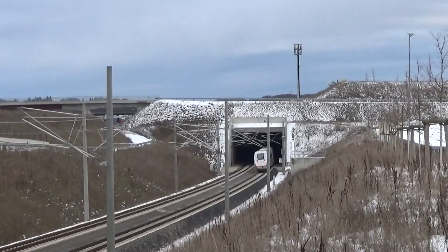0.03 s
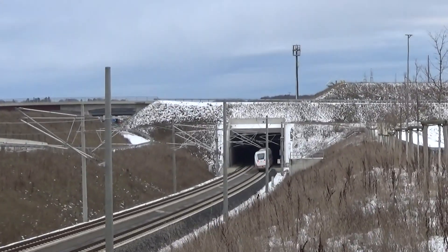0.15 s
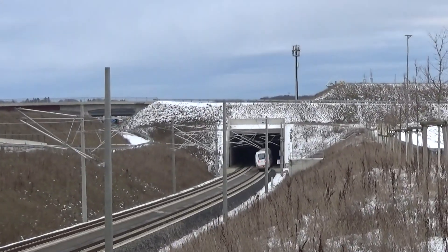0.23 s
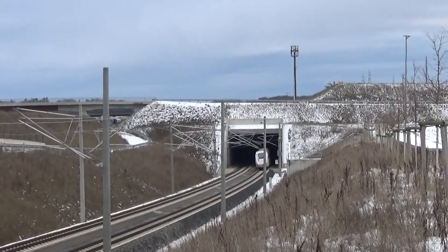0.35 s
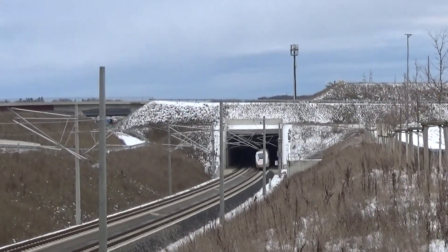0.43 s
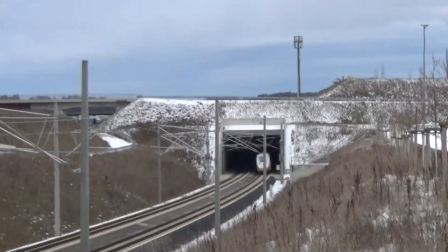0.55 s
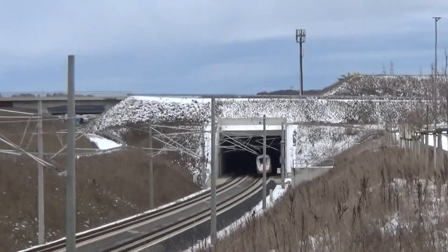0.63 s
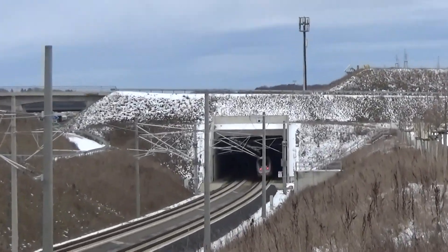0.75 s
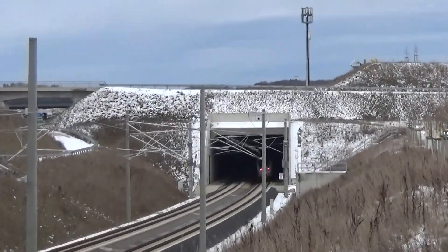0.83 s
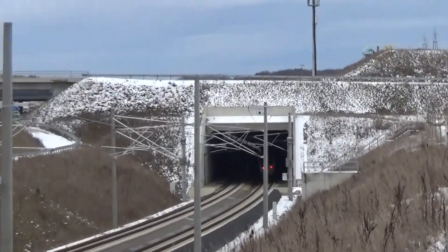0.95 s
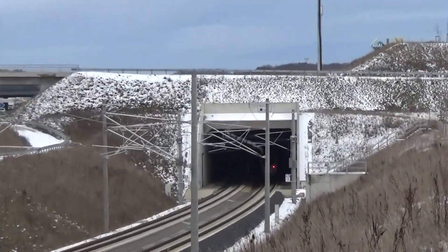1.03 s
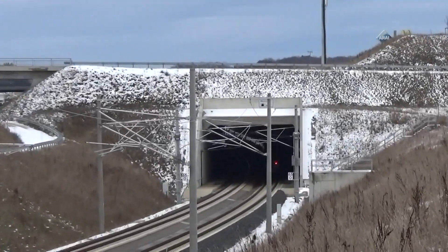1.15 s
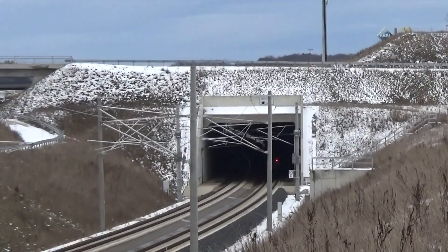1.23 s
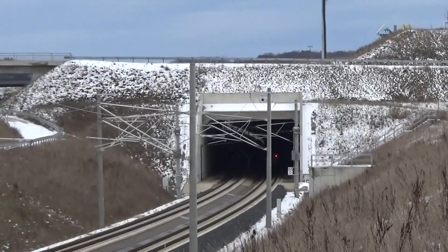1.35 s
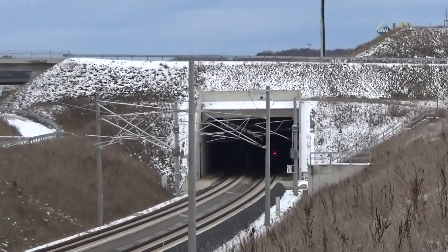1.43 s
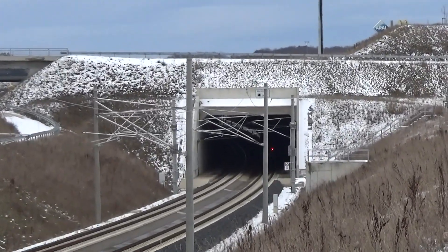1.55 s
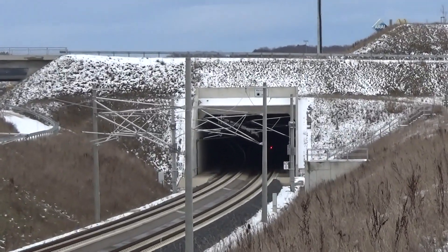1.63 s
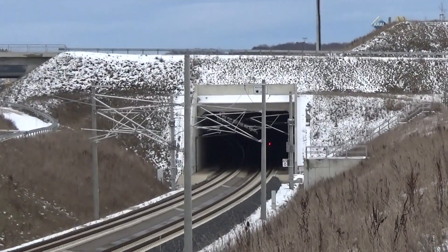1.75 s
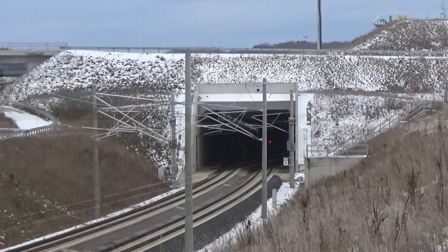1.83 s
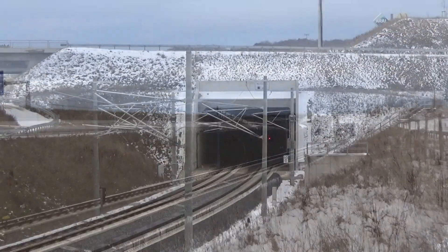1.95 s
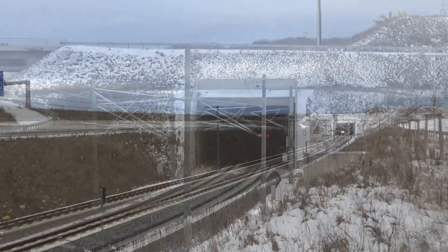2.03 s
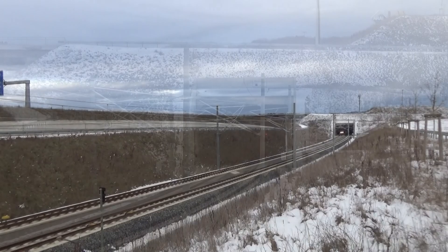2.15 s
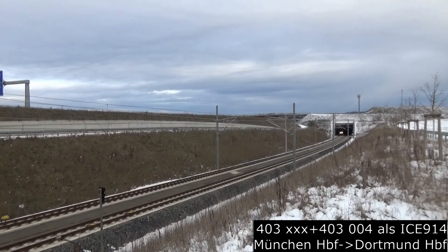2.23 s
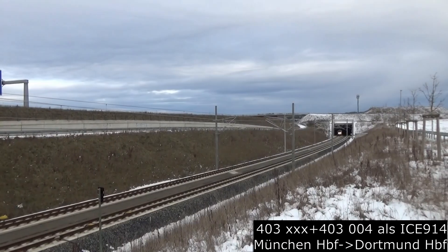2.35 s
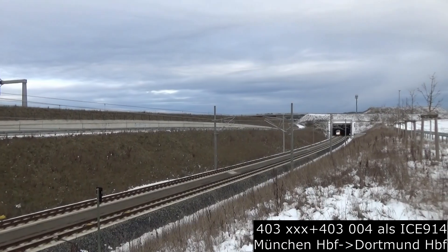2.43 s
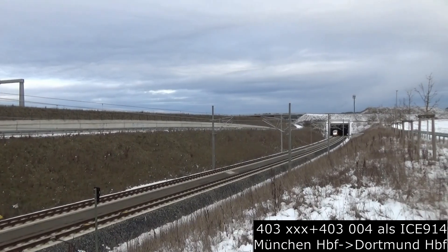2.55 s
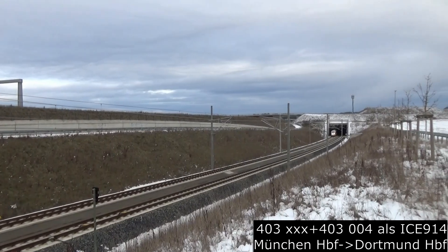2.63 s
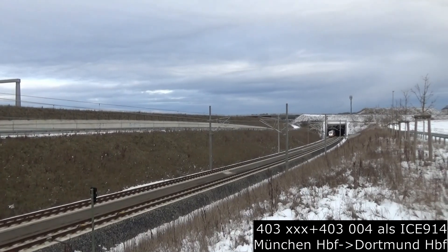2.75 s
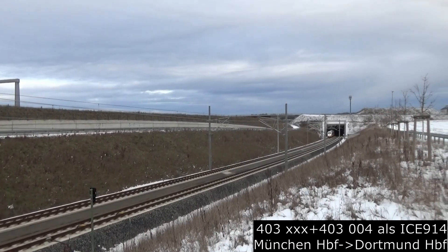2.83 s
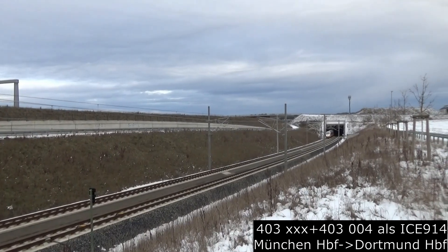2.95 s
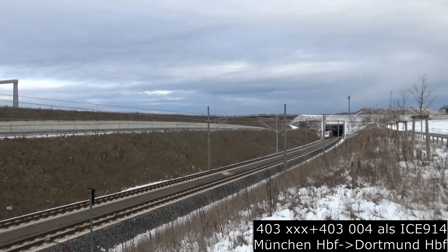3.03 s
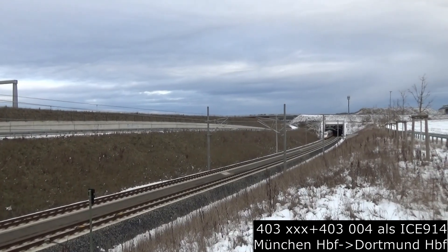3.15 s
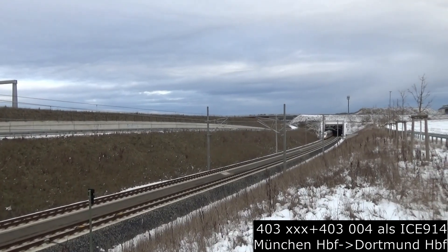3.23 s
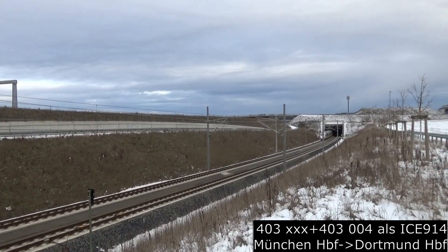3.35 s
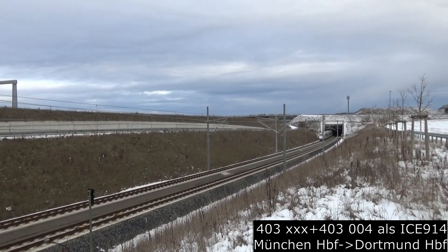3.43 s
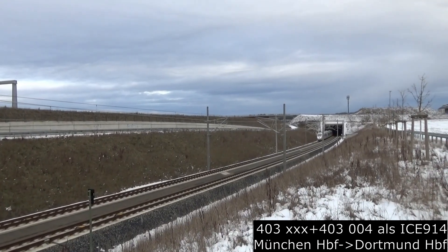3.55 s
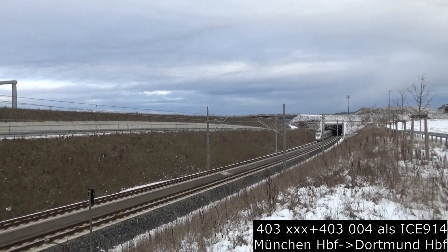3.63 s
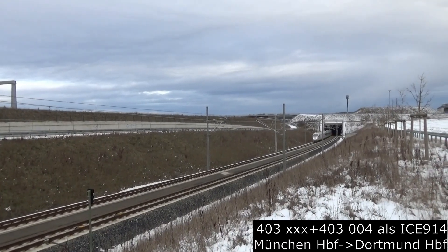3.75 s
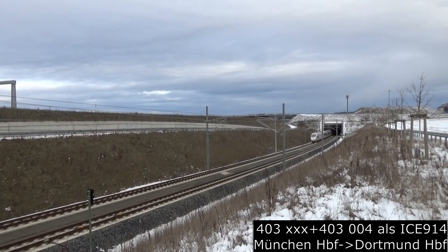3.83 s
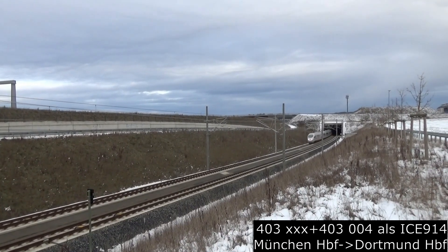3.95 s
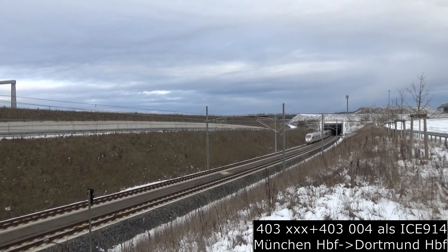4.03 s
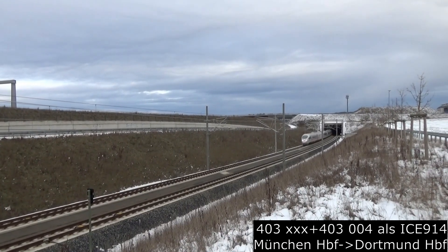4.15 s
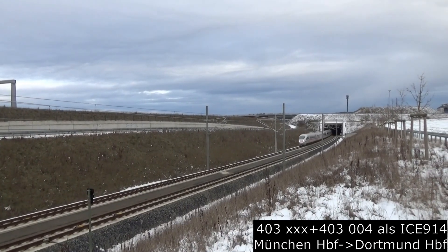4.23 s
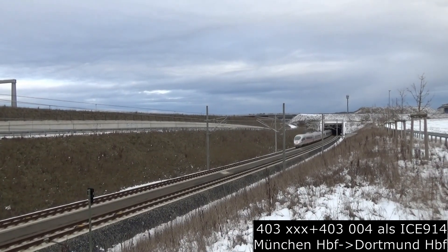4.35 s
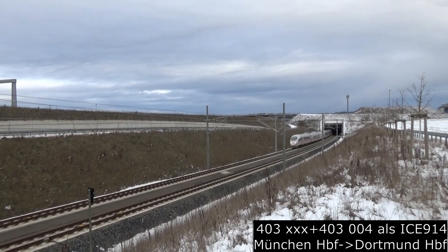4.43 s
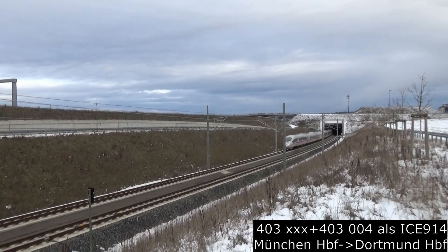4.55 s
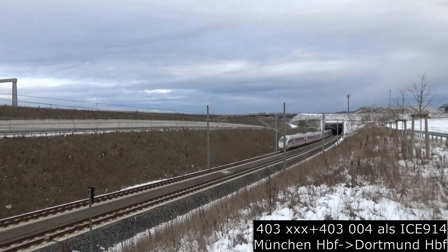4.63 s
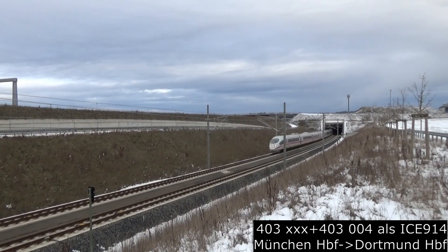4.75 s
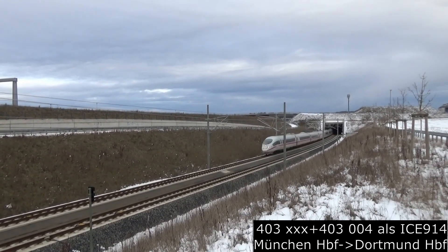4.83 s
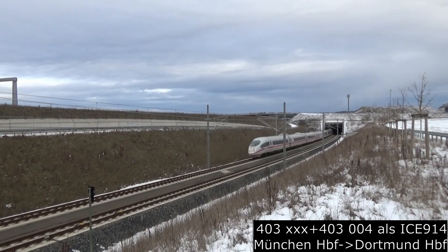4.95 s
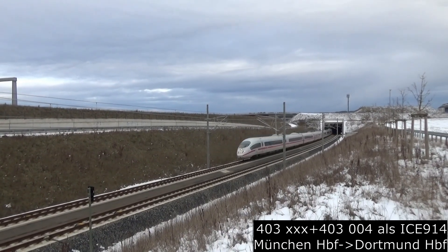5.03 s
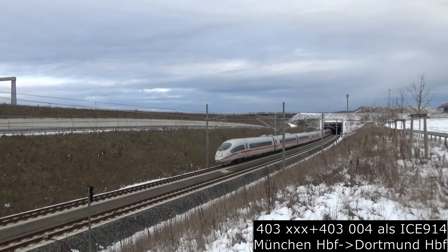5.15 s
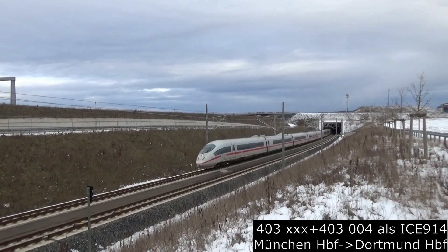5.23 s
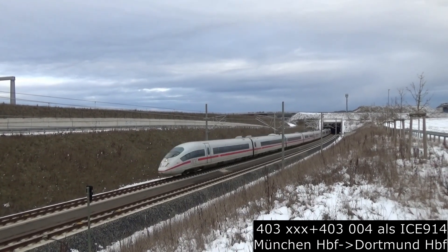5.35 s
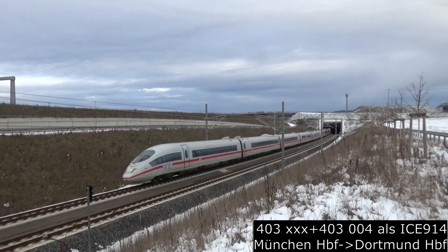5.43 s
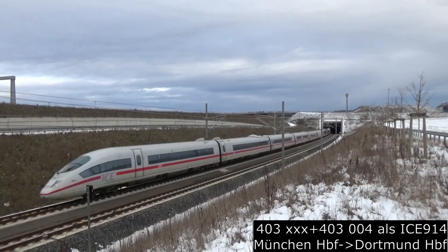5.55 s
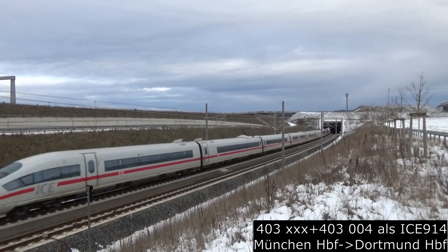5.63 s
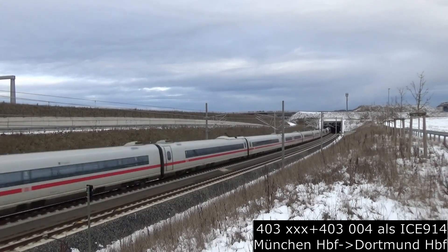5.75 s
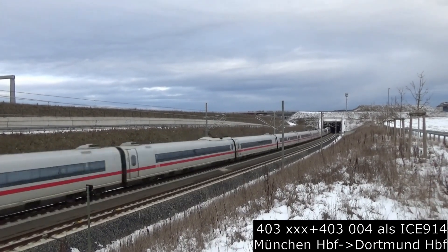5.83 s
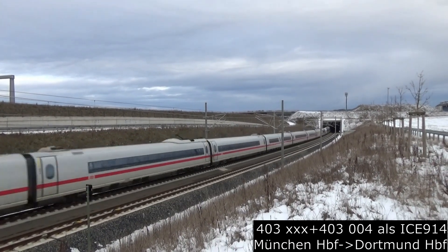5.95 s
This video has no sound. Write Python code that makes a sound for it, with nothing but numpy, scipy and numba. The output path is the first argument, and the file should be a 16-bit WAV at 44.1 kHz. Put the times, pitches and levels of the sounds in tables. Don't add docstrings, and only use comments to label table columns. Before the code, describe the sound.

Open snowy railway cutting, small near-mono camera close to the track. Distant traffic rumble and a departing train's fading rail hiss come first, with tiny housing ticks. After a soft scene change near two seconds, rails sing in uneven high surges, a low boom swells, and a fast train roars past, swinging left at the end.

```python
import sys
import numpy as np
from scipy import signal
from scipy.fft import rfft, irfft
from scipy.io import wavfile
from scipy.ndimage import uniform_filter1d
from numba import njit

SR = 44100
rng = np.random.default_rng(int(sys.argv[2]) if len(sys.argv) > 2 else 0)


def transcribe(u):
    v = np.clip(np.atleast_2d(u).T, -1, 1)
    q = np.round(v * 32767).astype(np.int16)
    wavfile.write(sys.argv[1], SR, q)


def natural_amplitude(level_db):
    exponent = np.asarray(level_db, float) / 20
    return 10 ** exponent


N = 264159
TIME = np.arange(N) / SR
FREQ = np.maximum(np.fft.rfftfreq(N, 1 / SR), 1)


def on_freq(table):
    hz, db = np.transpose(table)
    return np.interp(np.log(FREQ), np.log(hz), db)


def on_time(table):
    s, *columns = np.transpose(table)
    return [np.interp(TIME, s, column) for column in columns]


def unit(x):
    return x / np.sqrt(np.mean(x ** 2))


def walk(rate_hz):
    hold = int(SR / rate_hz)
    held = np.repeat(rng.standard_normal(N // hold + 1), hold)[:N]
    slow = uniform_filter1d(uniform_filter1d(held, hold), hold)
    return slow / slow.std()


# frequency in Hz, side minus mid in dB.
PORT_DIFFERENCE = [(60, -28), (200, -24), (380, -10.5), (600, -30), (1300, -44), (4400, -25), (8000, -27),
                   (9700, -13), (11000, -22.5), (15000, -37)]


def noise(gain):
    mid, side = rfft(rng.standard_normal((2, N))) * gain
    side = side * natural_amplitude(on_freq(PORT_DIFFERENCE))
    return unit(irfft(np.array([mid + side, mid - side]), N))


def part(tone, lo_hz, hi_hz):
    low_edge = 1 + (lo_hz / FREQ) ** 6
    high_edge = 1 + (FREQ / hi_hz) ** 6
    return natural_amplitude(on_freq(tone)) / np.sqrt(low_edge * high_edge)


def ring(hz, width_hz):
    return 1 / (1 + ((FREQ - hz) / width_hz * 2) ** 2)


def pan(db):
    return natural_amplitude(np.array([db, -db]) / 2)


@njit
def sweep(x, hz, width_hz):
    y, band, low = np.empty(len(x)), 0., 0.
    for i in range(len(x)):
        g, damping = np.tan(np.pi * hz[i] / SR), width_hz / hz[i]
        v = (band + g * (x[i] - low)) / (1 + g * (g + damping))
        band = 2 * v - band
        low = low + 2 * g * v
        y[i] = damping * v
    return y


def moving(hz, width_hz):
    return unit(np.array([sweep(sweep(port, hz, width_hz), hz, width_hz) for port in noise(1)]))


def fade_in(s, length_s):
    return np.sin(np.pi / 2 * np.clip((TIME - s) / length_s, 0, 1)) ** 2


DISSOLVE_S, DISSOLVE_LENGTH_S = 1.8, 0.28


def places(first, first_drift, second, second_drift):
    mix = fade_in(DISSOLVE_S, DISSOLVE_LENGTH_S)
    before = first + first_drift * TIME
    after = second + second_drift * (TIME - DISSOLVE_S)
    return (1 - mix) * before + mix * after


def peak(s, db, rise_db_s, fall_db_s):
    return db - np.where(TIME < s, rise_db_s * (s - TIME), fall_db_s * (TIME - s))


def swells(rows, edge_s=0.075):
    total_db = 0
    for s, length_s, db in rows:
        rise = fade_in(s - (length_s + edge_s) / 2, edge_s)
        fall = fade_in(s + (length_s - edge_s) / 2, edge_s)
        total_db = total_db + db * (rise - fall)
    return total_db


def lull(edge_s):
    return swells([(2.06, 0.3, -4)], edge_s)


# frequency in Hz, level in dB per Hz.
VALLEY_TONE = [(12, -39), (20, -29), (49, -1), (131, -1.5), (258, -10), (340, -10.5), (376, -16.5),
               (415, -13.5), (483, -19.5), (721, -12.5), (1730, -20), (5220, -52), (6070, -53), (7060, -49),
               (8000, -47), (10400, -38), (17600, -120)]


def valley():
    lull_db = lull(0.18)
    tyre_db = places(-42, 0.62, -40, -0.7) + lull_db
    rumble_db = places(-40, 0.64, -39.5, 1.1) + 0.5 * lull_db
    upper_db = places(-52.5, -1.5, -53.5, 1.65) + lull_db
    mouth_db = places(-55.5, 2, -63.5, 1) + swells([(1.55, 1, 5.7)], 0.25)
    pan_db = places(2, 0.6, 2.13, -0.47)
    drift_db = 0.4
    rumble = noise(part(VALLEY_TONE, 5, 430)) * natural_amplitude(drift_db * walk(4.76) + rumble_db)
    tyres = noise(part(VALLEY_TONE, 380, 1990)) * natural_amplitude(drift_db * walk(7.87) + tyre_db)
    upper = noise(part(VALLEY_TONE, 2330, 5900)) * natural_amplitude(drift_db * walk(12) + upper_db)
    mouth = noise(ring(702, 160)) * natural_amplitude(mouth_db)
    drone = noise(ring(108, 117)) * natural_amplitude(places(-62.5, -2.5, -39, -1.6))
    return drone + rumble * pan(0.66 * pan_db) + (tyres + mouth) * pan(pan_db) + upper * pan(0.5 * pan_db)


# frequency in Hz, level in dB per Hz.
RAIL_LOW = [(9000, -40), (10250, -15), (10500, 0), (11000, -2), (11700, -1), (11870, -14), (12600, -40)]
RAIL_HIGH = [(11500, -40), (12030, -14), (12180, -1), (13000, -2), (13760, 0), (14000, -14), (15700, -22)]
# multiple of the ripple rate, level in dB.
WHINE_ORDERS = [(9, -24), (10, -5), (11, -7), (12, -1.5), (13, 0), (14, -21)]
# centre in seconds, length in seconds, lift in dB, lean to the upper band in dB.
RAIL_SURGES = [(.11, .06, 6, 0), (0.267, 0.22, 3, 2.2), (.64, .2, 4.5, -2), (.88, .14, 4, -2),
               (1.12, .2, 4.5, -2.2), (1.62, 0.087, 7.5, -3), (2.15, .16, 2, 3), (2.58, .1, 5.5, 1.5),
               (2.82, 0.1, 4, 0), (3.028, 0.15, 8.5, 5), (3.233, .07, 5.5, 0), (3.39, 0.084, 8.5, 0),
               (3.607, 0.14, 4.5, -1.5), (3.823, .13, 5, 4), (4.044, 0.17, 9.5, 2),
               (4.185, 0.054, 2.5, -14), (4.372, .12, 3, 1.5), (4.612, 0.25, 7.5, -2),
               (4.782, 0.073, 10, 3), (4.89, .12, 2, 4), (5.174, .1, 8.5, 2.5), (5.26, 0.059, 10, 0),
               (5.37, .07, 2, 0), (5.64, .06, 3, -2.5), (5.87, .28, 11, 1)]


def rails():
    mix = fade_in(DISSOLVE_S, DISSOLVE_LENGTH_S)
    leaving_db = -62.5 - 3.5 * TIME
    coming_db = peak(4.64, -48, rise_db_s=7, fall_db_s=4)
    steel_db = (1 - mix) * leaving_db + mix * coming_db
    surge_db = swells([(s, length_s, db) for s, length_s, db, lean in RAIL_SURGES])
    lean_db = swells([(s, length_s, lean / 2) for s, length_s, db, lean in RAIL_SURGES])
    low_db = steel_db + surge_db - lean_db + places(0.6, -2.5, -5, 0.55)
    high_db = steel_db + surge_db + lean_db
    flutter_db = walk(35) + 0.29 * walk(22.46)
    fading = 1 - 0.61 * fade_in(5.27, 0.28)
    hiss = noise(part(RAIL_LOW, 8600, 15900)) * natural_amplitude(low_db - 2.0 + 0.73 * walk(24.6))
    hiss = hiss + noise(part(RAIL_HIGH, 9000, 17000)) * natural_amplitude(high_db - 1.5 + 0.67 * walk(25.1))

    whine_hz, sag_hz_s2 = 13860, 10.5
    top_hz = whine_hz - sag_hz_s2 * (TIME - DISSOLVE_S) ** 2
    phase = 2 * np.pi * np.cumsum(top_hz / 13) / SR
    whine_db = coming_db - 4.5 + 0.77 * surge_db - 5 * fade_in(5.6, 0.13)
    whine = 0
    for k, db in WHINE_ORDERS:
        line = walk(105) * np.sin(k * phase) + walk(105) * np.cos(k * phase)
        whine = whine + natural_amplitude(db + 0.68 * walk(3.7)) * line
    whine = whine * natural_amplitude(whine_db) * fade_in(2.0, 0.15)
    return (hiss * fading + whine) * natural_amplitude(flutter_db)


# frequency in Hz, level in dB per Hz.
CAMERA_HISS = [(3000, -10), (5300, -3), (6200, 0), (9000, -1), (12000, -1), (14200, -1), (15800, -2)]
# centre in Hz, width in Hz, level in dB, share of the common lift.
CAMERA_WHINES = [(6230, 110, -80, 0.47), (9710, 72, -70.5, 0.97), (12260, 50, -72, 0.71),
                 (15620, 30, -85, -1)]
# time in seconds, peak in dB, centre in Hz.
HOUSING_TICKS = [(1.108, -38.5, 3740), (1.2201, -46, 3000), (1.2646, -44, 3000), (1.655, -41, 3600),
                 (1.7978, -57, 3020), (1.9139, -46, 3140), (1.935, -50, 3080), (2.0178, -46.5, 3750),
                 (2.2308, -56, 3380), (2.4179, -25.5, 5960), (2.428, -40, 3340), (3.2594, -50, 3100)]


def camera():
    lift_db = np.maximum(1 - 4.5 * TIME, peak(5.04, 15.1, rise_db_s=8.1, fall_db_s=14))
    hiss_db = places(-70, 0.2, -69, -4.5) + lull(0.2) - 15 * fade_in(3.4, 0.9)
    out = noise(part(CAMERA_HISS, 3000, 18000)) * natural_amplitude(hiss_db)
    for hz, width_hz, db, share in CAMERA_WHINES:
        out = out + noise(ring(hz, width_hz)) * natural_amplitude(db + share * lift_db + 1.5 * walk(6.96))

    lead = 100
    age = np.arange(-lead, 600) / SR
    shape = np.where(age < 0, np.exp(age / 0.00041), np.exp(-age / 0.0022))
    dull = signal.butter(4, 9000, fs=SR, output="sos")
    for s, db, hz in HOUSING_TICKS:
        grit = rng.standard_normal(len(age))
        tick = sweep(grit * shape, np.full(len(age), float(hz)), 5500.0)
        tick = signal.sosfilt(dull, tick)
        tick = tick / np.abs(tick).max() * natural_amplitude(db - 2.5)
        at = int(s * SR) - lead
        out[:, at:at + len(age)] += tick * pan(2.2)[:, None]
    return out


def train_pan():
    return 8.5 * np.maximum(TIME - 5.6, 0)


# time in seconds, centre in Hz.
BOOM_HZ = [(3.3, 118), (3.8, 149), (4.4, 132), (4.55, 205), (5.0, 182.6), (5.12, 145), (5.25, 183),
           (5.46, 220), (5.99, 152)]
# centre in seconds, length in seconds, lift in dB.
BOOM_BEATS = [(3.83, 0.059, 7.5), (4.0, .06, 1.5), (4.08, 0.13, -5), (4.2, 0.035, 2), (4.3, 0.19, 2.5),
              (4.445, 0.03, 8.5), (4.59, .06, 3.5), (4.73, .1, -2), (4.86, 0.034, 1), (5.05, 0.17, 2.5),
              (5.135, 0.023, -3.5), (5.215, .06, 1)]


def nose():
    boom_db = peak(5.25, -18, rise_db_s=11.5, fall_db_s=18.5) + swells(BOOM_BEATS, 0.028)
    hz, = on_time(BOOM_HZ)
    body_tone = [(60, -10.5), (150, 1.0), (245, -4.0), (285, -18.5), (360, -16), (430, -20.5), (700, -24.5)]
    body = noise(part(body_tone, 61, 540))
    boom = (0.64 * moving(hz, 47.0) + 0.7 * body) * natural_amplitude(0.16 * walk(29) + boom_db)
    sub_db = peak(4.43, -29, rise_db_s=14, fall_db_s=0.3) + swells([(3.65, 0.28, 14)], 0.2)
    sub_tone = [(20, -32), (35, -24), (60, -7), (100, -2.5)]
    sub = noise(part(sub_tone, 40, 110)) * natural_amplitude(sub_db)
    return (boom + sub) * pan(0.04 + 1.3 * train_pan()) * fade_in(3.17, 1.4)


# centre in seconds, length in seconds, air lift in dB, wheel lift in dB.
GUSTS = [(4.77, .36, 2.5, 3.5), (5.19, .04, 2.5, 0), (5.275, .05, 5, 2.5), (5.36, .11, 6.8, 3.5),
         (5.47, .06, 4, 4.5), (5.56, .04, -2.5, 0), (5.64, .11, 3.8, .3), (5.92, .09, 2.5, 1.8)]


def passing(s, db, steepness, fall_db_s, air_share, wheel_share):
    speed_m_s, track_m = 70, 8
    metres = np.hypot(speed_m_s * np.maximum(s - TIME, 0), track_m)
    rows = [(at, length_s, air_share * air + wheel_share * wheel) for at, length_s, air, wheel in GUSTS]
    distance_db = 20 * steepness * np.log10(metres / track_m)
    return peak(s, db, 0, fall_db_s) - distance_db + swells(rows, 0.026)


# frequency in Hz, level in dB per Hz.
CARS_TONE = [(120, -33), (200, 2.5), (321, -6), (422, -17.5), (642, -8), (814, -10.5), (1260, -11),
             (1360, -14), (1850, -15.5), (2570, -17), (4950, -26), (6750, -25), (12300, -30), (14000, -39),
             (15600, -36.5)]
# centre in Hz, width in Hz, level in dB.
WHEEL_MODES = [(1335, 36, -10.5), (1515, 44, -11), (1955, 25, -17), (2480, 35, -18), (3210, 30, -27)]
# time in seconds, centre in Hz, dB over the rolling.
WHEEL_RING = [(4, 695, -7), (5.1, 680, -2.5), (5.3, 1470, -13), (5.55, 1400, -6.5), (5.7, 1290, -3.5),
              (5.8, 1030, -7), (5.99, 850, -12)]


def carriages():
    roll_db = passing(5.5, -22.2, steepness=0.9, fall_db_s=1.2, air_share=0.12, wheel_share=0)
    hiss_db = passing(5.36, -28.7, steepness=1.22, fall_db_s=0.8, air_share=0, wheel_share=1)
    air_db = passing(5.29, -36.3, steepness=1.42, fall_db_s=3.5, air_share=1, wheel_share=0)
    hz, ring_db = on_time(WHEEL_RING)
    roll = 0.85 * noise(part(CARS_TONE, 323, 1760)) + moving(hz, 285.0) * natural_amplitude(ring_db)
    modes = sum(noise(ring(f, width_hz)) * natural_amplitude(db + 1.8 * walk(9)) for f, width_hz, db in WHEEL_MODES)
    modes = modes * fade_in(5.36, 0.23) * (1 - 0.85 * fade_in(5.7, 0.036))
    wheels = (roll + modes) * natural_amplitude(roll_db) * fade_in(4.14, 0.94)
    hiss = noise(part(CARS_TONE, 1640, 3700)) * natural_amplitude(hiss_db + 0.25 * walk(20))
    air = noise(part(CARS_TONE, 3600, 13300)) * natural_amplitude(air_db + 0.88 * walk(24.84))
    axle_db = -47 + 1 * (TIME - 3.5)
    axle = noise(ring(691.5, 40)) * natural_amplitude(axle_db) * fade_in(4.13, 0.24)
    return (axle + wheels + (hiss + air) * fade_in(3.4, 1.0)) * pan(0.18 + train_pan())


def scene():
    return valley() + rails() + camera() + nose() + carriages()


def roll_off(x):
    return signal.sosfilt(signal.butter(12, 15760, fs=SR, output="sos"), x)


def record(dry):
    top = 0.55
    mix = top * np.tanh(dry / top)
    return roll_off(mix)


dry = scene()
out = record(dry)
transcribe(out)
```